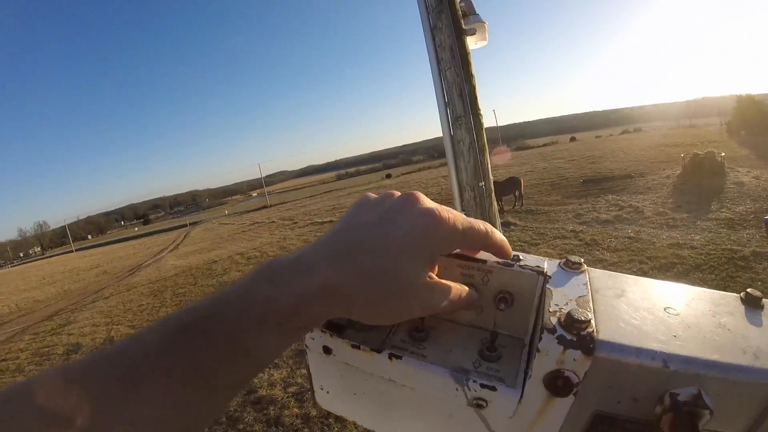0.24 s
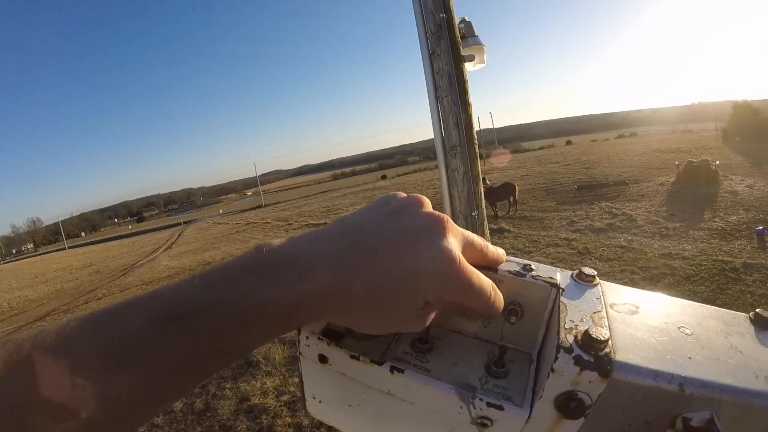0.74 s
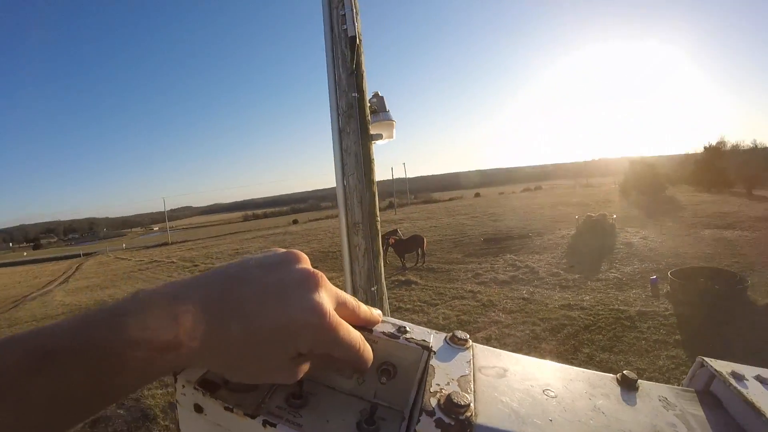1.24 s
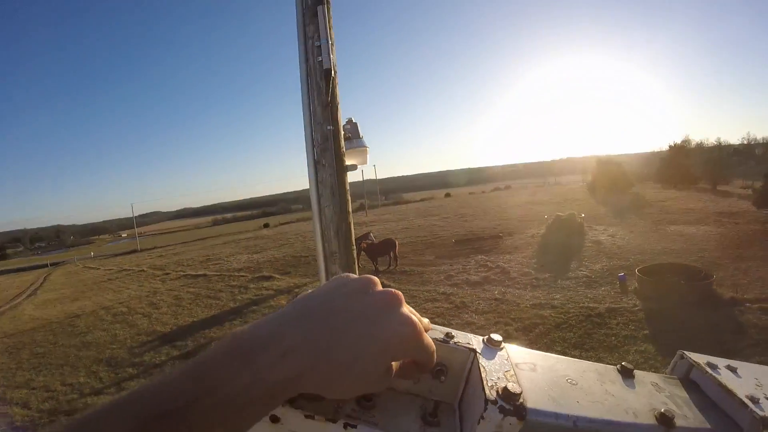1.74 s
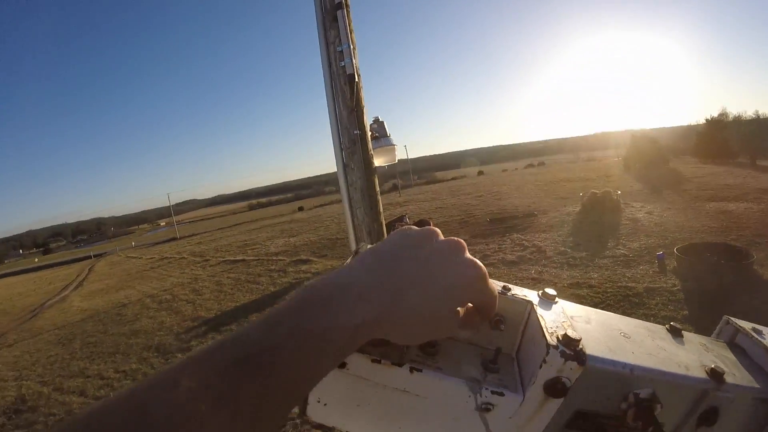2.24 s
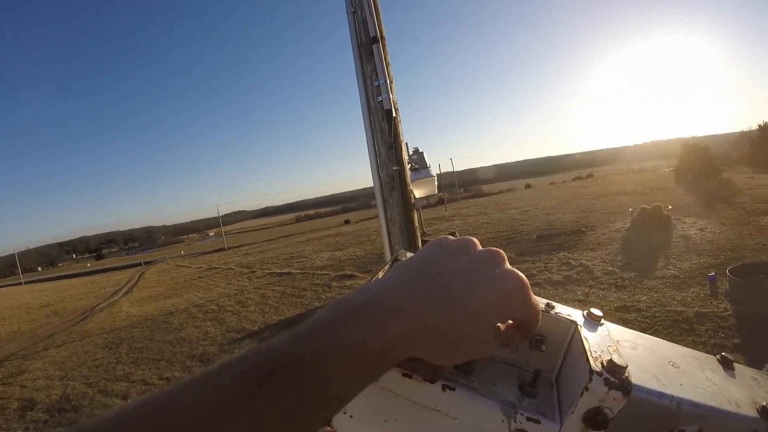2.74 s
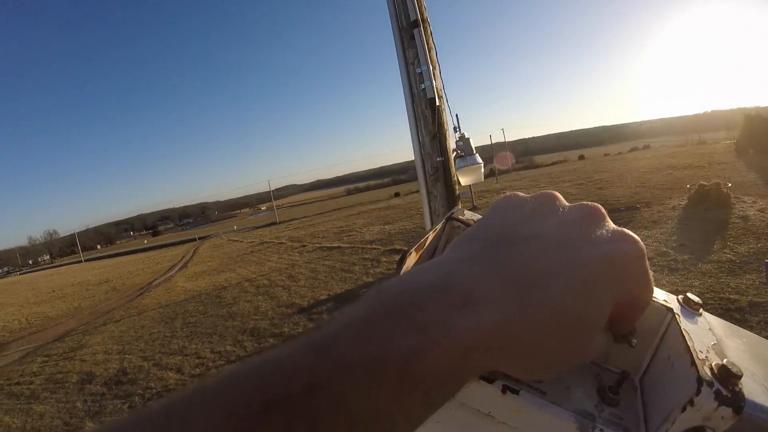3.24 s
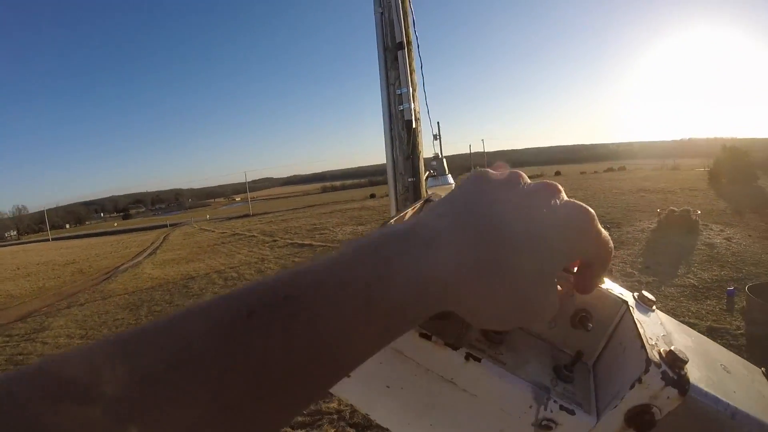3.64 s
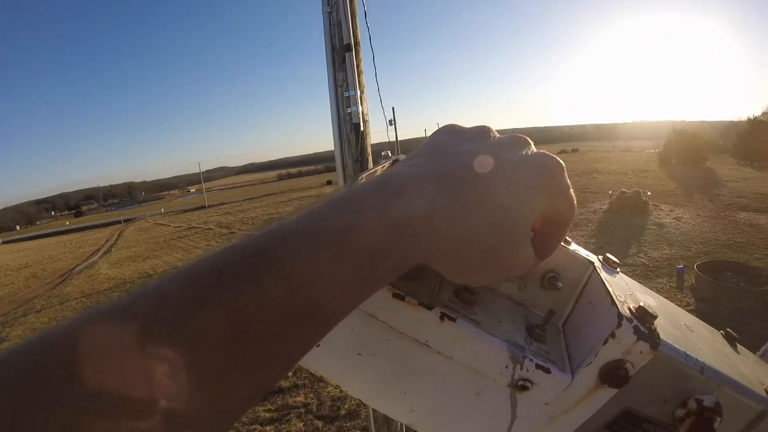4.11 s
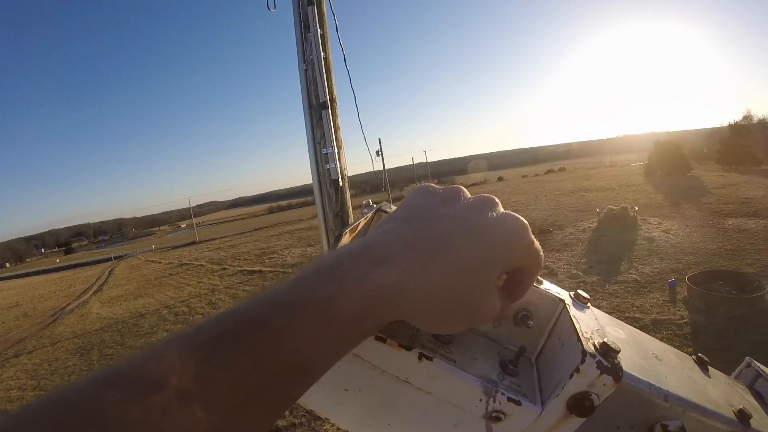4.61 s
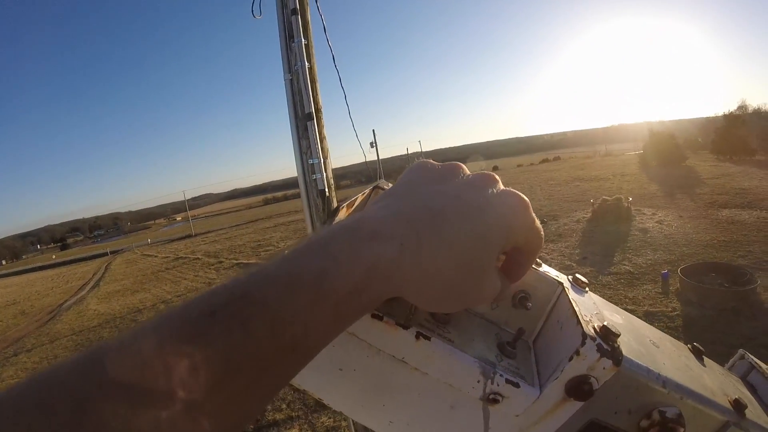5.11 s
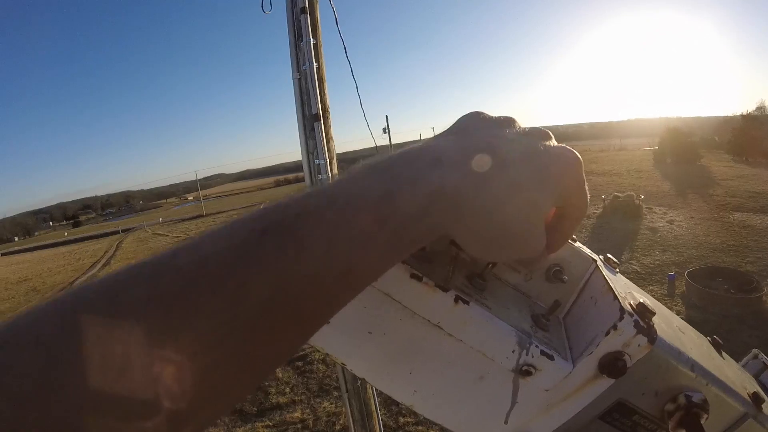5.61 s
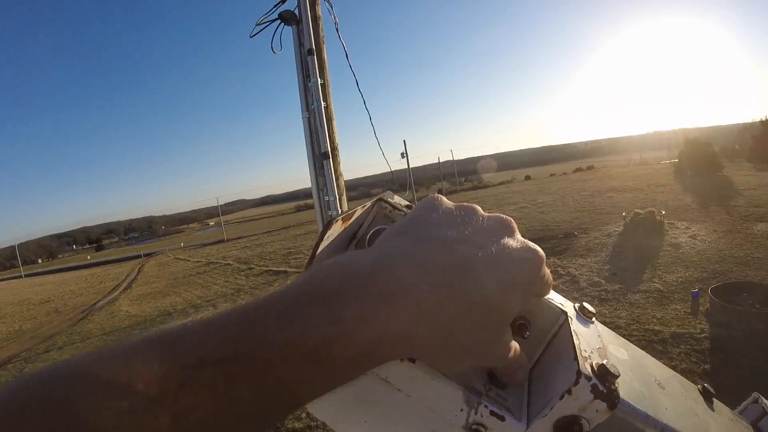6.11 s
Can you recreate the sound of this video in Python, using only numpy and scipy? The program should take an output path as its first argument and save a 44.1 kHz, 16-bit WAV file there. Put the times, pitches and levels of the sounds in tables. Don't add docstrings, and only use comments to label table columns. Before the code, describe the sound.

Close small camera microphone in a raised bucket outdoors: droning truck engine, buzzing hydraulic pump and thin gear whine, with soft wind buffets. Scattered dull taps and scrapes on a hollow steel box come early, then a long mostly steady stretch of hum. Finally a loud double clack of the lever, the pump note drops away, and knocks, jingles and bucket bumps follow over the engine.

```python
import sys
import numpy as np
from scipy import signal
from scipy.fft import rfft, irfft, next_fast_len
from scipy.io import wavfile
from scipy.ndimage import uniform_filter1d

SR = 44100
rng = np.random.default_rng(int(sys.argv[2]) if len(sys.argv) > 2 else 0)


def voltage_ratio(level):
    return 10 ** (np.asarray(level, float) / 20)


def store_pcm(level_fs):
    pcm = np.round(np.clip(level_fs, -1, 1) * 32767).astype(np.int16)
    wavfile.write(sys.argv[1], SR, np.atleast_2d(pcm).T)


N = 280476
T = np.arange(N) / SR
TOP_HZ = 15250

# time in seconds, tooth rate in Hz, level in dB.
PUMP_LOAD = [(0.05, 302, -31), (0.28, 303, -32), (0.6, 305.2, -27), (0.83, 307, -27), (1.12, 310.4, -28),
             (1.35, 310.6, -27.5), (1.6, 309.5, -25), (1.85, 308.8, -25), (2.1, 306.7, -25.5),
             (2.38, 307.3, -26), (2.85, 303, -29), (3.3, 302.3, -31), (3.8, 303.3, -31),
             (4.4, 304.3, -30.5), (4.95, 304.6, -31), (5.3, 307.2, -30), (5.9, 307.5, -29)]
# time in seconds, level in dB.
PUMP_FREED = [
    (5.945, -32),
    (5.97, -51),
    (6.07, -39),
    (6.11, -30),
    (6.2, -40),
    (6.36, -46),
]
RELEASE_S = PUMP_FREED[0][0]


def unit(x):
    return x / np.sqrt(np.mean(x ** 2) + 1e-20)


def curves(rows):
    s, *cols = np.transpose(rows)
    return [np.interp(T, s, c, left=c[0], right=c[-1]) for c in cols]


def wobble(rate):
    knots = rng.standard_normal(int(N * rate / SR) + 4)
    return np.interp(T * rate, np.arange(len(knots)), knots)


def swells(steady_db, rows):
    t = T[::64]
    power = voltage_ratio(2 * steady_db)
    power = power + sum(voltage_ratio(2 * db) * np.exp(-((t - s) / half_s) ** 2) for s, half_s, db in rows)
    return np.interp(T, t, 10 * np.log10(power))


def noise(response):
    m = next_fast_len(N + 8192)
    spectrum = rfft(rng.standard_normal(N), m) * response(np.fft.rfftfreq(m, 1 / SR))
    return unit(irfft(spectrum, m)[:N])


def shape(points):
    hz, db = np.transpose(points)
    return lambda f: voltage_ratio(np.interp(np.log(f + 1), np.log(hz + 1), db))


def tone(turns, db):
    return np.sqrt(2) * voltage_ratio(db) * np.sin(2 * np.pi * (turns + rng.random()))


def stack(orders, turns, unsteady_db, rate):
    climb_s = (1.0, 4.85)
    height = np.interp(T, climb_s, (-.5, .5))
    out = np.zeros(N)
    for k, db, gain_db in orders:
        phase = round(k) * turns + .1 * wobble(2)
        out += tone(phase, db + gain_db * height + unsteady_db * wobble(rate))
    return out


def engine(cycle):
    # multiple of the firing cycle, level half way up in dB, gain over the climb in dB.
    firing_orders = [(2, -57, -1), (3, -46, 1), (4, -51, -9), (5, -33, -2), (6, -46, -1), (7, -42, -7),
                     (8, -32, 1), (9, -53, 0), (11, -51, 7), (13, -53, -2), (14, -56, -3), (15, -52, -5),
                     (16, -44.5, -6), (17, -48, -5), (19, -45, -11), (20, -47, 6), (21, -57, 5),
                     (22, -51, 0), (24, -53.5, 0), (27, -58, -4), (28, -68, 15), (36, -55, -1),
                     (39, -63, 12), (42, -49, -2), (50, -62, 9), (54, -65, 6), (58, -61, 7), (63, -60, 8),
                     (66, -60, 8), (72, -69, 1)]
    crank_lead = 1.002
    return stack(firing_orders, crank_lead * cycle, unsteady_db=1.54, rate=6)


def pump_hum(teeth, loaded):
    level_db = curves([(s, db) for s, hz, db in PUMP_LOAD] + PUMP_FREED)[0]
    hum = tone(teeth, level_db + 0.47 * wobble(40))
    # (time in seconds, half length in seconds, level in dB).
    blooms = [
        (2, -55, [(.2, 0.28, -51), (.8, 0.14, -47), (2.25, 0.47, -42.5), (3.95, 0.22, -43), (4.7, 0.37, -41), (5.45, 0.42, -48.5)]),
        (3, -55.5, [(0, 0.49, -53), (1.5, 0.77, -58), (2.4, 0.15, -50.5), (4.5, 0.27, -53), (5.4, 0.32, -51)]),
    ]
    (second, *second_db), (third, *third_db) = blooms
    dump_db = -1
    hum += tone(round(second) * teeth, swells(*second_db) + dump_db * (1 - loaded) + 0.92 * wobble(37))
    whine = tone(round(third) * teeth, swells(*third_db) + 1.0 * wobble(40))
    for k, db in [(4, -68), (5, -73), (6, -80), (7, -80), (8, -83)]:
        whine += tone(k * teeth, db + 3 * wobble(2.7))
    return hum + loaded * whine


def gear_whine(cycle):
    # (time in seconds, half length in seconds, level in dB).
    blooms = [(7, -78, [(.85, .25, -66), (2.8, .3, -68), (3.85, .25, -68), (5.4, .4, -66)]),
              (10, -78, [(.15, .25, -69), (1.7, .3, -69), (2.65, .25, -68), (5, .7, -69)]),
              (3, -73, [(.7, 0.69, -54.5), (2.6, 1, -51.5), (4.3, .4, -66.5), (5.9, 0.18, -59)]),
              (8, -81, [(.3, 0.33, -67), (1.8, 0.31, -66.5), (2.7, 0.32, -67), (4.3, 0.6, -68.5),
              (5.5, 0.54, -68)]), (9, -70.5, [(.06, .1, -58.5), (.22, 0.13, -59.5), (.85, 0.11, -64),
              (2.3, 0.23, -63.5), (2.8, .15, -71.5), (3.8, 0.35, -64), (4.55, 0.3, -60),
              (5.35, 0.31, -60.5)])]
    # multiple, level half way up in dB, gain over the climb in dB.
    weak_orders = [(5, -78, -4), (6, -70, 0), (12, -82, 3), (14, -81, 2), (15, -82, 0)]
    mesh_per_cycle, backlash_meshes = 23.735, .012
    mesh = mesh_per_cycle * cycle + backlash_meshes * wobble(25)
    whine = stack(weak_orders, mesh, unsteady_db=3, rate=2.5)
    for k, db, rows in blooms:
        whine += tone(round(k) * mesh, swells(db, rows) + 2.8 * wobble(9))
    return whine


def machine():
    free_s = T - RELEASE_S
    runup_hz_per_s, teeth_per_cycle = 30, 32
    tooth_hz = curves(PUMP_LOAD)[0] + runup_hz_per_s * np.maximum(free_s, 0)
    teeth = np.cumsum(tooth_hz) / SR
    cycle = teeth / teeth_per_cycle
    loaded = np.clip(-free_s * 50, 0, 1)
    return pump_hum(teeth, loaded) + loaded * gear_whine(cycle) + engine(cycle)


def add(out, s, modes, attack):
    longest_s = max(m[2] for m in modes)
    t = T[:int(SR * min(longest_s, .3) * 1.3) + 64]
    ring = sum(voltage_ratio(db - 60 * t / max(t60, .002)) * np.sin(2 * np.pi * hz * t) for hz, db, t60 in modes)
    part = out[round(s * SR):][:len(t)]
    part += (ring * (1 - np.exp(-t / attack)))[:len(part)]


def crowd(centre_hz, octaves, db, t60, count=22):
    place, size = rng.random((2, count))
    off = 4 * (np.arange(count) + place) / count - 2
    modes = []
    for hz, up, low in zip(centre_hz * 2 ** (octaves * off), off, size):
        modes.append((hz, db + 2 - 3.0 * up * up - 6 * low - 99 * (hz > TOP_HZ), t60))
    return modes


def box_knocks(out):
    # time in seconds, peak in dB, low mode in Hz, high mode in Hz, low mode level in dB.
    knocks = [(0.379, -35.5, 1270, 1520, 1.5), (0.544, -43, 1290, 1650, -10),
              (0.7474, -35.5, 778, 1650, -11), (1.1942, -26, 725, 1530, -7), (1.1947, -36, 2500, 3600, 0),
              (1.2836, -39, 2300, 2860, 0), (1.335, -42, 1500, 2500, 0), (1.2317, -20, 990, 2760, -1),
              (1.4615, -34, 730, 2860, 12), (1.488, -29.5, 1290, 1890, -4), (1.5135, -30, 710, 2870, 2),
              (1.5535, -37, 954, 1510, 5.5), (1.562, -40, 950, 1500, 6), (1.666, -38, 740, 1570, 9),
              (2.185, -38.5, 1610, 3720, -34.5), (2.391, -34.5, 740, 1570, 9), (2.564, -34, 729, 1740, -10),
              (3.349, -34.5, 735, 1530, 0), (4.2906, -37, 754, 2160, 5), (6.073, -23, 746, 1630, -22),
              (6.145, -18.5, 750, 1670, -13), (6.156, -29, 730, 2110, -14), (6.3474, -24.5, 710, 1580, -7)]
    t60_s = 0.026
    for s, db, low_hz, high_hz, low_db in knocks:
        modes = [(low_hz, db + low_db, 0.9 * t60_s), (high_hz, db - 0.5, 0.52 * t60_s)]
        modes += crowd(.8 * high_hz, .55, db - 18.0, 1.6 * t60_s)
        add(out, s, modes, attack=0.00058)


def grit_ticks(out):
    # time in seconds, peak in dB, bright half in dB, bright centre in Hz.
    ticks = [(0.5438, -37.5, -24, 9000), (0.7486, -43, -32, 9000), (1.1326, -41, -20.5, 9000),
             (1.1938, -38, -9, 9450), (1.232, -52, -22, 9000), (2.257, -51.5, -7.5, 8800),
             (2.2605, -39.5, -13, 8700), (2.2668, -34, -12, 8800), (2.2834, -42.5, -13, 6500),
             (2.287, -49, -8, 8700), (2.295, -36, -22, 7500), (2.3177, -53, -13, 9500),
             (2.352, -50, -20, 6000), (2.3872, -38, -20.5, 8500), (2.3994, -33, -18.5, 8000),
             (2.4145, -35, -11, 8500), (2.4245, -34, -13, 7500), (2.562, -40, -18.5, 8200),
             (2.566, -41.5, -8.5, 6500), (5.893, -25.5, -10, 8920), (5.897, -37, -10.5, 8000),
             (5.9386, -18, -15, 10000), (5.9935, -43, -16, 9000), (6.0483, -43, -11.5, 9470),
             (6.133, -47, -11, 10000), (6.147, -37.5, -10, 10500), (6.16, -36, -20, 6000),
             (6.218, -46, -8, 10000), (6.212, -50, -8, 9000), (6.2425, -33, -17, 8000),
             (6.289, -38, -11, 8000), (6.293, -35, -14, 8000), (6.3013, -38, -17.5, 7000),
             (6.309, -43, -14, 7500), (6.3554, -43, -14, 8000)]
    rebounds_s = (0, .0004, .0008)
    for s, db, bright_db, bright_hz in ticks:
        t60_s = 0.0095 * 2 ** ((db + 40) / 22.5)
        for late_s in rebounds_s:
            fade_db = db - 12.5 - 3000 * late_s
            modes = crowd(4300, 0.46, fade_db, 0.9 * t60_s)
            modes += crowd(bright_hz, .21, fade_db + bright_db + 11.5, 0.75 * t60_s)
            add(out, s + late_s, modes, attack=0.0002)


def wall_bumps(out):
    # time in seconds, level in dB, mode in Hz, t60 in seconds.
    bumps = [(5.989, -28, 189, 0.059), (6.221, -19, 338, 0.094), (6.24, -34, 410, 0.074),
             (6.33, -30, 303, 0.065)]
    for s, db, hz, t60 in bumps:
        add(out, s, [(hz, db, t60), (1.5 * hz, db - 10, t60)], attack=0.0031)


def lever_release(out):
    # time in seconds, level in dB, share of full ring time.
    detent, stop = [(5.8938, -26, 1)], [(5.9395, -20, 0.92)]
    # frequency in Hz, level in dB, t60 in seconds.
    rod, box = [(1658, -16, .05), (2582, 0, .3), (2522, 2.5, .05), (950, -14, .08), (5157, -36, .08)], [(245, 0, 0.068), (844, -12, 0.045), (1200, -19, 0.041), (1690, -10, 0.051),
                             (1890, 2, 0.039), (2110, 0.5, 0.055), (4600, -19, 0.04), (4940, -22, .03),
                             (7260, -18, 0.025)]
    for blows, modes, rise_s in (detent, rod, .0015), (stop, box, .00032):
        for s, db, share in blows:
            add(out, s, [(hz, db + level_db, share * t60) for hz, level_db, t60 in modes], attack=rise_s)


def latch_jingle(out):
    # time in seconds, level in dB.
    shakes = [
        [(6.049, -47), (6.16, -39.5), (6.215, -49.5), (6.312, -61)],
        [(6.049, -44), (6.312, -56)],
        [(5.995, -51), (6.16, -60), (6.315, -60)],
        [(6.292, -58.5)],
        [(6.049, -59), (6.16, -66)],
        [(6.16, -63)],
        [(5.995, -64), (6.16, -64)],
    ]
    # link mode in Hz, t60 in seconds.
    links = [(5017, .07), (7250, .04), (8440, .07), (14500, .07), (12300, .04), (11500, .04), (13600, .07)]
    for blows, (hz, t60) in zip(shakes, links):
        for s, db in blows:
            add(out, s, [(hz, db, t60)], attack=0.0013)


def controls():
    out = np.zeros(N)
    for strike in box_knocks, grit_ticks, wall_bumps, lever_release, latch_jingle:
        strike(out)
    return out


def hand():
    # time in seconds, half length in seconds, level in dB, brightness in dB per octave.
    rubs = [(1.21, 0.019, -52.5, 2.5), (1.233, 0.013, -42.5, -2.5), (1.281, 0.042, -48.5, 0),
            (1.466, 0.009, -43.5, -3), (1.515, 0.014, -48, -2), (1.351, .015, -58, -1),
            (1.56, .02, -52, -4), (2.225, 0.027, -52, -2), (2.411, .04, -59, 2), (5.947, 0.0075, -41, 4.5),
            (5.992, 0.036, -44, 0.5), (6.058, 0.039, -52, -0.5), (6.146, 0.026, -42, -6),
            (6.23, 0.025, -44, -1), (6.294, 0.024, -41.5, -2.5), (6.36, 0.016, -41.5, -1)]
    # frequency in Hz, width in Hz, level in dB.
    panel = [(1020, 630, 2), (1538, 380, 4.5), (2300, 450, 1.5), (2890, 480, -0.5), (3650, 520, -4),
             (4610, 730, -9.5), (6450, 1300, -12), (8440, 1100, -10.5), (10000, 1600, -19),
             (13700, 1800, -24.5)]
    grains = unit(voltage_ratio(2.5 * wobble(400)))
    modes = np.array([voltage_ratio(db) * noise(lambda f: (f * w / (c * c - f * f + 1j * f * w)) ** 2)
                      for c, w, db in panel])
    octaves = np.log2(np.transpose(panel)[0] / 1500)
    grip_share = 0.58
    out = np.zeros(N)
    for s, half_s, db, tilt_db in rubs:
        near = slice(round((s - 4 * half_s) * SR), round((s + 4 * half_s) * SR))
        t = T[near]
        stroke = np.exp(-.5 * ((t - s) / np.where(t < s, grip_share * half_s, half_s)) ** 2)
        out[near] += stroke * (voltage_ratio(db - 8.0 + tilt_db * octaves) @ modes[:, near])
    return out * grains


def scuffs():
    # time in seconds, half length in seconds, level in dB, pitch in Hz.
    drags = [(1.23, .02, -46, 2700), (1.27, .03, -53, 2860), (1.24, .03, -50.5, 3700),
             (1.295, .02, -54, 3700), (1.29, .03, -57, 2260), (1.28, .035, -59, 4600),
             (1.345, .015, -58, 2500), (1.225, .02, -62, 6600), (1.245, .02, -64, 8300),
             (1.295, .02, -66, 8500), (1.225, .025, -68, 10200), (1.29, .025, -70, 10000),
             (1.235, 0.01, -73.5, 13300), (1.275, .025, -75, 13900), (1.465, .009, -44, 2880),
             (1.462, .008, -60, 5600), (1.462, .008, -71, 12100), (1.556, .006, -59, 3000),
             (1.492, 0.009, -54, 1900), (1.512, .007, -47, 2900), (1.511, .006, -72, 11700),
             (2.235, .03, -64, 3000), (2.263, .004, -49.5, 8860), (2.564, .003, -60, 6800),
             (2.564, .003, -63, 8900), (2.29, .006, -64, 8800), (2.468, .01, -73, 9500),
             (5.896, .003, -58, 14500), (5.906, .006, -70, 14000), (5.941, .004, -55, 12200),
             (5.897, 0.004, -51, 7800), (5.95, 0.01, -62, 9800), (5.908, .008, -66, 7800),
             (5.905, .008, -62, 5000), (5.905, .008, -68, 10200), (6.0, 0.0091, -70, 13500),
             (6.022, .015, -70, 12400), (6.03, 0.033, -52, 1900), (5.957, .015, -57, 4300),
             (5.955, .012, -68, 12000), (6.147, .004, -60, 12300), (6.193, .008, -65, 9300),
             (6.19, .04, -52, 1800), (6.22, .008, -56, 9200), (6.219, .004, -58, 6200),
             (6.222, .01, -68, 11900), (6.29, .04, -51.5, 1797), (6.148, .004, -52, 7200),
             (6.33, .01, -68, 9000), (6.255, .008, -70, 12500)]
    width_share, bite_share, grain_db = 0.09, .5, 2.5
    out = np.zeros(N)
    for s, half_s, db, hz in drags:
        near = np.flatnonzero(abs(T - s) < 3 * half_s)
        t = T[near]
        span = max(round(SR / (width_share * hz)), 2)
        sway = rng.standard_normal((2, SR // 3))
        sway = uniform_filter1d(uniform_filter1d(sway, span), span)[:, :len(near)]
        stroke = np.exp(-.5 * ((t - s) / np.where(t < s, bite_share * half_s, half_s)) ** 2)
        turn = 2 * np.pi * hz * t
        band = stroke * (sway[0] * np.cos(turn) + sway[1] * np.sin(turn))
        out[near] += voltage_ratio(db) * unit(band) * np.sqrt(np.mean(stroke ** 2))
    return out * unit(voltage_ratio(grain_db * wobble(300)))


def exhaust_roar():
    # frequency in Hz, level in dB.
    spectrum = [(80, -120), (150, -8), (250, 0), (400, 0), (560, -5), (720, -6), (850, -19.5),
                (1100, -23.5), (1800, -47.5), (3000, -120)]
    # time in seconds, half length in seconds, level in dB.
    sways = [
        (5.947, 0.058, -44),
        (6.233, 0.025, -45),
        (6.36, 0.041, -44.5),
    ]
    freed_db = 3.5
    level_db = swells(-47.5, sways) + freed_db * (T > RELEASE_S)
    return voltage_ratio(level_db + 5.5) * noise(shape(spectrum)) * voltage_ratio(0.47 * wobble(20))


def wind():
    # time in seconds, buffet in dB, thump in dB.
    gusts = [(.07, -32, -38.5), (.36, -31, -52), (.69, -34.5, -36), (.85, -43, -52), (1.2, -30, -53),
             (1.659, -34, -57), (2.05, -45, -40), (3.9, -30, -43.5), (4.41, -29, -48), (4.55, -36, -42),
             (4.7, -38, -50), (5.23, -27, -42), (5.38, -36, -38.5), (5.95, -38.5, -40), (6.04, -28, -45),
             (6.13, -44, -44)]
    # frequency in Hz, level in dB per Hz.
    buffet_shape, thump_shape = [(8, -8), (25, 0), (60, -5.5), (90, -5.5), (130, -38), (200, -120)], [(40, -120), (70, -13.5), (100, 3), (150, 3), (240, -9.5),
                                                 (300, -27.5), (500, -120)]
    gust_s, thump_s, calm_db, calm_thump_db = 0.064, 0.08, -41, -50
    buffet_db = swells(calm_db, [(s, gust_s, db) for s, db, _ in gusts])
    thump_db = swells(calm_thump_db, [(s, thump_s, db) for s, _, db in gusts])
    buffet = voltage_ratio(buffet_db - 0.5) * unit(noise(shape(buffet_shape)) * voltage_ratio(4.1 * wobble(12)))
    return buffet + voltage_ratio(thump_db - 0.3) * unit(noise(shape(thump_shape)) * voltage_ratio(1.6 * wobble(38)))


def valve_clatter():
    # frequency in Hz, level in dB.
    spectrum = [(600, -36), (905, -7.5), (1140, -13.5), (2070, -14), (2580, -19.5), (3600, -24.5),
                (8620, -35.5), (12600, -41.5), (15200, -57)]
    # time in seconds, half length in seconds, level in dB.
    spells = [(.75, 0.16, -66.5), (5.95, 0.033, -57.5), (6.15, 0.14, -65.5), (6.29, 0.034, -60.5)]
    flutter = voltage_ratio(.6 * wobble(14) + .6 * wobble(2.5))
    return voltage_ratio(swells(-65, spells) + 9.5) * noise(shape(spectrum)) * flutter


def scene():
    handling = controls() + hand() + scuffs()
    air = exhaust_roar() + wind() + valve_clatter()
    return (machine() + handling + air)[None]


def band_limit(x):
    return signal.sosfilt(signal.butter(12, 15340, fs=SR, output="sos"), x)


def record(dry):
    limited = irfft(rfft(dry) * (np.fft.rfftfreq(N, 1 / SR) < TOP_HZ), N)
    mix = limited * np.minimum(T / .003, 1)
    return band_limit(mix)


dry = scene()
out = record(dry)
store_pcm(out)
```